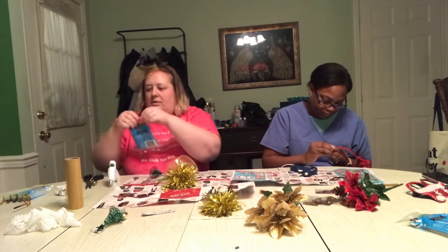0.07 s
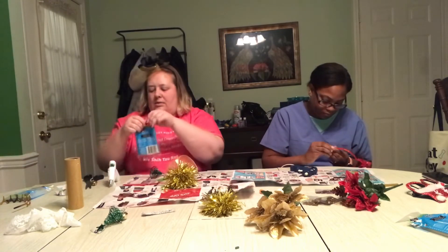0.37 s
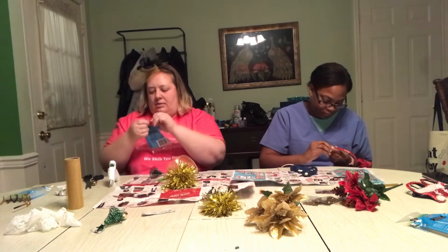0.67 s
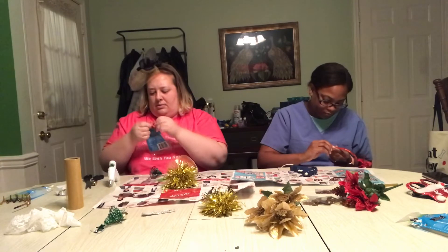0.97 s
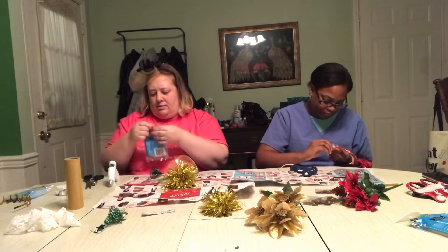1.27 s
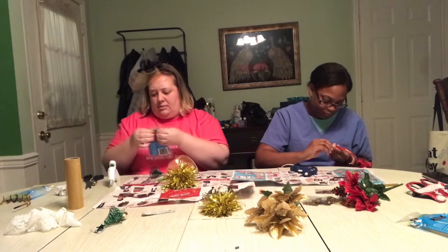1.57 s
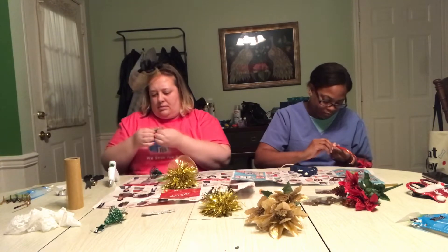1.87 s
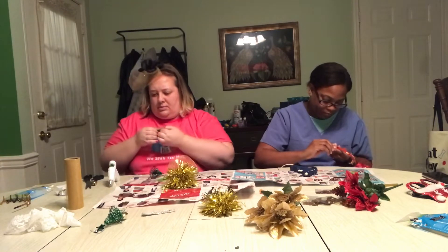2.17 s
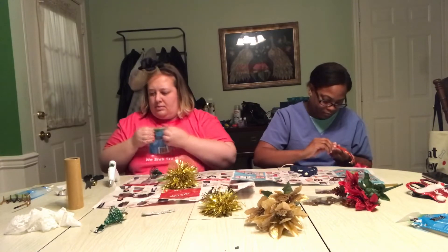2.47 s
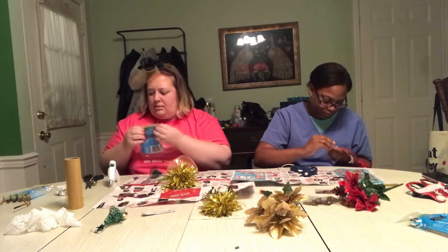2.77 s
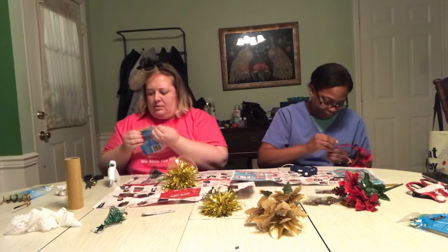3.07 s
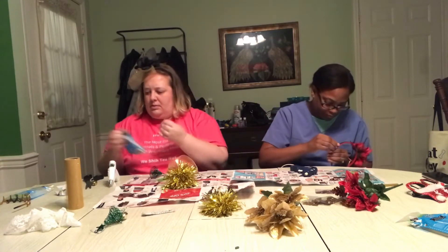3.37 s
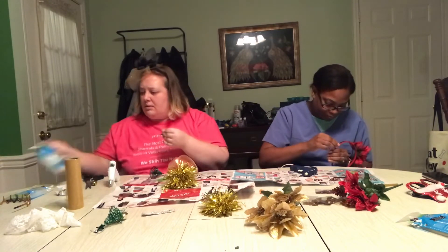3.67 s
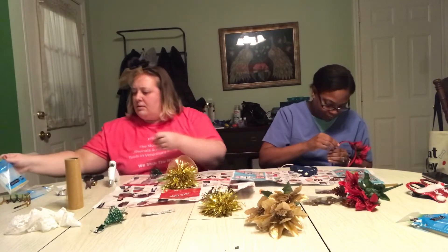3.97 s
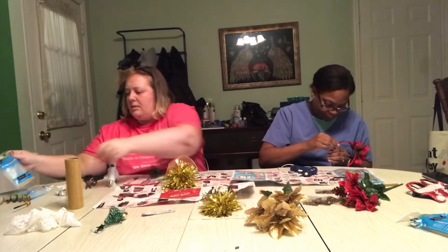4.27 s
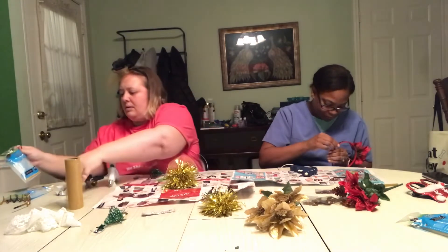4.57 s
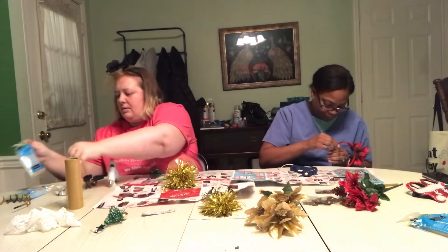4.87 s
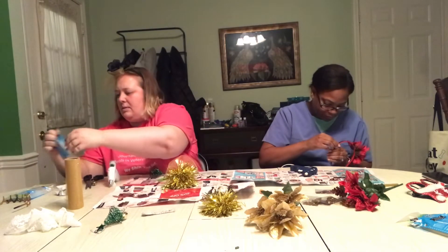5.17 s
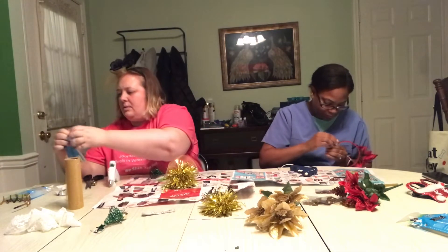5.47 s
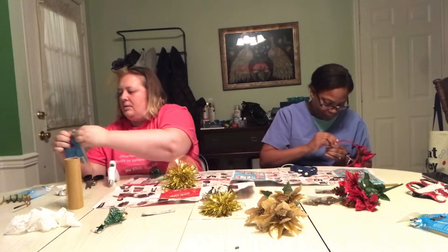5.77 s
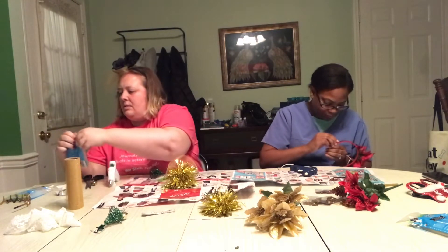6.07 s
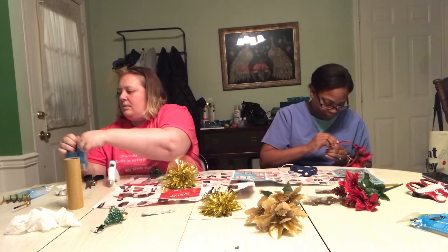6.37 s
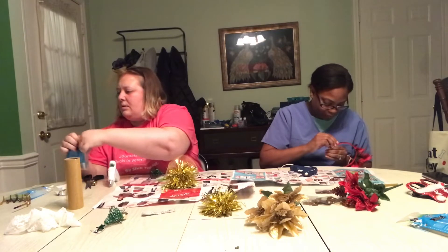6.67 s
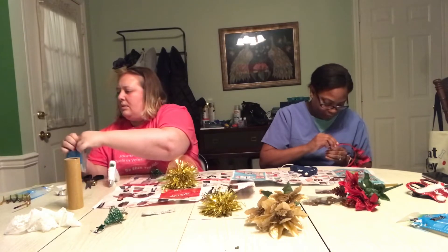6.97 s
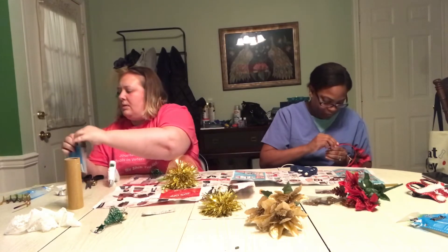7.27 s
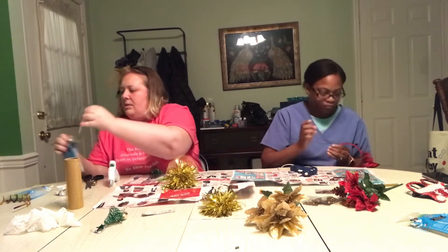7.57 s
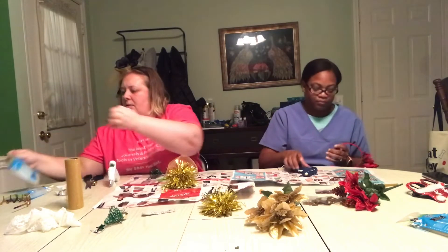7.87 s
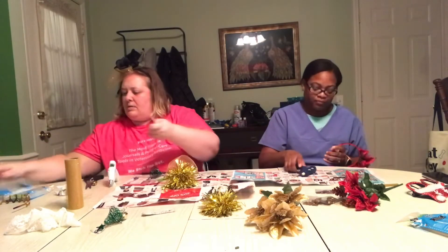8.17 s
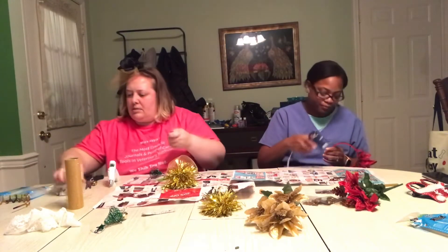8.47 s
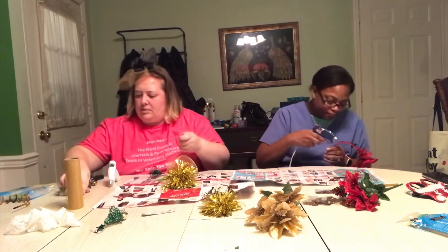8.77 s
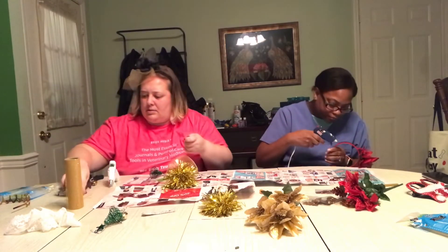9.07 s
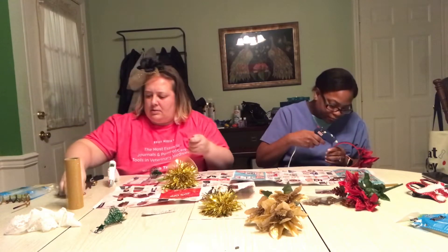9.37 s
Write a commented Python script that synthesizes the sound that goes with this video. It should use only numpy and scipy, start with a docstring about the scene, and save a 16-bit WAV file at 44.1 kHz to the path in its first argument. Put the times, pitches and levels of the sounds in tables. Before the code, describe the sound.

From the start, fingers squeeze and pull a stiff plastic packet, making uneven bursts of crinkling dotted with sharp, slightly hollow snaps. The crackle grows busier around 1.5 seconds. At about 2.4 seconds the packet gives way with one loud crack, by far the loudest sound. Handling continues, with two strong snaps near 3.2 and 3.4 seconds. From 3.5 to about 5.5 seconds there are only faint rustles and a few ticks, with a brief pause. Moderate crinkling and scattered clicks return from 5.6 to 8 seconds. Just after 8 seconds the packet skids briefly along a table and lands at about 8.25 with a light slap and a small thud. A couple of very faint rustles follow before the end, around 9.4 seconds. One microphone hears everything in a small dining room with short reverberation, a quiet, steady rush of air and a low electrical hum.

```python
"""A small dining room, one microphone, a stiff plastic packet held at the chest and later at arm's length.
The film crackles as fingers work it, single creases buckle with sharp snaps, and the packet gives way
with one loud crack. After more handling it skids along the table and lands with a slap.
Behind it are the room's short reverberation, its quiet rush of air and a low mains hum."""
import sys
import numpy as np
from scipy import signal
from scipy.fft import rfft, irfft
from scipy.io import wavfile
from scipy.ndimage import uniform_filter1d

SR = 44100
rng = np.random.default_rng(int(sys.argv[2]) if len(sys.argv) > 2 else 0)


def master(y):
    """Save y as 16-bit WAV."""
    cut = np.clip(np.atleast_2d(y).T, -1, 1)
    pcm = np.round(cut * 32767)  # scale
    wavfile.write(sys.argv[1], SR, pcm.astype(np.int16))


N = 414540
TAPS, TOP_HZ = 2048, 16100
HZ = np.fft.rfftfreq(TAPS, 1 / SR)
REACH_S = 3.45  # the opened packet is carried out to arm's length

# Room tone. Each row: frequency in Hz, relative level in dB.
AIR_COLOUR = [(12, -59), (25, -32), (40, -10), (70, -4), (104, -13.5), (123, -15.5), (241, -16), (262, -24),
              (301, -15), (328, -20), (422, -24.5), (780, -26.5), (1120, -28), (1400, -31.5),
              (13900, -45.5), (16000, -47)]
# Mains hum. Each row: frequency in Hz, level in dB.
HUM_PARTIALS = [(60, -69), (120, -77), (181, -75), (240, -75.5)]
# The packet shifting in the hands. Each row: start in seconds, end in seconds, relative level in dB.
HOLDS = [(0.03, .95, -66), (1.05, 3.38, -61), (3.45, 4.35, -73), (5.08, 5.6, -75), (5.65, 7.3, -66),
         (7.35, 8.07, -69), (8.35, 8.5, -70), (9.22, 9.38, -76)]
# Fingers squeezing and pulling. Each row: start in seconds, length in seconds, relative level in dB,
# then hollow body and crisp edge in dB against that level.
SQUEEZES = [(0.09, .05, -52.5, 2, -10), (0.155, .055, -46.5, -1, -7), (0.28, .16, -60, -2, -11),
            (0.47, .075, -54.5, 0, -6), (0.59, .10, -58, 5, -7), (0.735, .08, -58.5, -4, -9),
            (0.985, .04, -70, 9, -10), (1.024, .085, -53, 6, -11), (1.155, .045, -58, 2, -8),
            (1.278, .135, -49, 1, -7), (1.42, .09, -57, -3, -3), (1.54, .055, -45.5, -4, -11),
            (1.595, .07, -43, -3, -8), (1.68, .06, -47, -11, -7), (1.785, .085, -46, -11, -7),
            (1.90, .09, -52, -7, -10), (2.01, .11, -52, -3, -6), (2.15, .12, -50.5, 0, -7),
            (2.28, .07, -54, 1, -7), (2.383, .04, -41.5, -1, -5), (2.5, .07, -47, -10, -11),
            (2.6, .13, -56.5, 1, -7), (2.77, .2, -61, -1, -3), (3.0, .19, -61, -1, -8),
            (3.202, .09, -44.5, -4, -5), (3.335, .05, -40, -3, -4), (3.52, .05, -59, 0, -12),
            (3.62, .025, -56, -4, -3), (3.745, .095, -55, -7, -11), (3.95, .18, -67, -4, -3),
            (4.21, .1, -67, 0, -5), (4.46, .13, -69, -1, 2), (5.345, .03, -57, -4, -6),
            (5.4, .1, -63, -1, -9), (5.61, .11, -62, -2, -6), (5.74, .12, -58, 3, -7),
            (5.915, .095, -54.5, -1, -9), (6.02, .08, -51, -5, -6), (6.185, .13, -59, -1, -2),
            (6.34, .08, -55, 0, -6), (6.44, .06, -60, 1, -7), (6.515, .145, -53, -8, -8),
            (6.765, .045, -57.5, 1, -1), (6.98, .125, -57, -3, -5), (7.12, .19, -57.5, -2, -9),
            (7.485, .06, -58, -1, -3), (7.675, .13, -60, -3, -14), (7.83, .055, -53.5, -5, -5),
            (7.925, .05, -50.5, -6, -9)]
# The crackle at the chest, then at arm's length. Each row: frequency in Hz, relative level in dB.
CHEST_COLOUR = [(110, -35.5), (200, -14.5), (330, -8.5), (420, -10), (520, -1.5), (680, -1.5), (1140, -3.5),
                (1500, -11), (2000, -9), (4000, -5.5), (8700, -13), (10600, -14), (13000, -15.5),
                (16000, -22)]
REACH_COLOUR = [(160, -50), (280, -11), (326, -3), (442, -7), (515, 0), (786, -6.5), (1050, -0.5),
                (1600, -10.5), (1800, -10), (1960, -11), (2940, -8.5), (5700, -10.5), (7600, -19),
                (12600, -20.5), (16000, -27.5)]
# The air in the packet, sealed (used before REACH_S) and open (after).
# Each row: resonance in Hz, half-width in Hz, boost in dB.
POUCH_RESONANCES = [(620, 110, 2.5), (1089, 100, 3.5)]
# The loudest creases buckling. Each row: time in seconds, energy above the hollow body in dB,
# ring in Hz, then hollow body and crisp edge in dB against that energy.
SNAPS = [(0.0375, -27, 3900, -9, -16), (0.0962, -23, 3800, -5, -6), (0.1013, -18, 3360, -6, -7),
         (0.1621, -18.5, 3900, 1, -3), (0.1967, -13.5, 2700, -1, -5), (0.2862, -19.5, 2800, -6, -3),
         (0.3083, -21.5, 3500, -24, -20), (0.3592, -22.5, 3900, 0, -10), (0.3987, -19.5, 4000, -2, -16),
         (0.4341, -15.5, 5400, -5, -9), (0.4942, -17.5, 7100, -1, -2), (0.5266, -20, 6900, -8, -10),
         (0.5862, -23, 6100, -6, -4), (0.636, -23, 2300, 8, -10), (0.704, -19, 3460, -18, -14),
         (0.7398, -12.5, 3530, -11, -11), (0.775, -15, 5630, -13, -5), (0.874, -27, 4070, -6, -6),
         (1.0327, -17.5, 3820, -14, -12), (1.076, -17, 5570, 2, -9), (1.1098, -17.5, 3870, -11, -5),
         (1.1715, -18, 4000, -1, -9), (1.297, -19.5, 3300, -11, -15), (1.3075, -18, 3800, -13, -10),
         (1.3337, -14.5, 3970, -12, -7), (1.3932, -13.5, 3900, -6, -5), (1.4314, -16, 5300, -3, -1),
         (1.5441, -17.5, 3600, -2, -4), (1.6219, -13, 8850, -22, -1), (1.6831, -14, 5270, -11, -14),
         (1.7375, -16, 4500, -2, -3), (1.793, -12.5, 2360, -8, -14), (1.8159, -18, 4000, -9, -1),
         (1.8378, -11.5, 5600, -19, -3), (1.8763, -15.5, 5700, -11, -3), (2.0434, -19, 2200, -9, -2),
         (2.0695, -21, 6600, -24, -1), (2.1434, -16, 8750, -19, -1), (2.1618, -19, 8300, 0, -1),
         (2.1875, -13.5, 3900, -2, -10), (2.2428, -16.5, 5640, 1, -9), (2.3249, -19.5, 5700, -9, -1),
         (2.3904, -13.5, 5500, -4, -8), (2.404, -16, 6800, 0, -1), (2.5934, -14, 2460, -11, -3),
         (2.6715, -24.5, 5000, 12, -7), (2.6894, -17.5, 4930, -24, -6), (2.7932, -22.5, 2800, 1, -15),
         (2.8837, -10, 4000, -6, -10), (3.0385, -26, 5500, -1, -13), (3.1094, -24, 5600, -13, -4),
         (3.2027, -4.5, 4340, -7, -4), (3.2112, -15, 5630, 3, -10), (3.248, -13.5, 4600, -22, -3),
         (3.3598, -12, 2290, -5, -2), (3.5323, -25, 5040, -7, -18), (3.8229, -20, 4250, -15, -15),
         (4.11, -26, 5600, -6, -11), (5.0833, -34, 3220, -7, -22), (5.257, -35, 2870, 0, -20),
         (5.348, -26, 4500, -4, -9), (5.5965, -26, 4100, -8, -8), (5.6715, -22.5, 2300, -7, -8),
         (5.9591, -22.5, 3800, -7, -20), (6.1864, -17, 4770, -9, -13), (6.259, -20, 4600, -11, -4),
         (6.399, -32, 3800, 12, -13), (6.585, -21, 3780, -1, -10), (6.638, -28.5, 3000, 8, -12),
         (6.6433, -21, 8900, -17, -1), (6.7634, -13.5, 2610, -6, -1), (6.9881, -22.5, 5300, -16, -9),
         (7.0263, -18.5, 5700, -21, -11), (7.0838, -23, 5500, -22, -6), (7.5437, -16, 4740, -13, -5),
         (7.8419, -20, 7200, -9, -9), (7.9431, -19, 4500, -7, -13), (8.0737, -22.5, 3850, -11, -7),
         (8.1715, -14.5, 3500, -9, -9), (8.2495, -13, 5200, 2, -9), (8.389, -32, 3500, -8, -14)]
# One snap. Each row: frequency in Hz, relative level in dB.
SNAP_COLOUR = [(100, -33), (300, -31.5), (550, -12), (800, -5.5), (1080, 3.5), (1600, -12.5), (2200, -7),
               (3000, -8.5), (4200, -6), (6500, -6), (9500, -10.5), (11000, -12), (16000, -13.5)]
# The packet giving way: time in seconds, energy in dB, room send in dB.
CRACK = (2.442, 12.5, -1.4)
# The crack toward the microphone, then all round. Each row: frequency in Hz, relative level in dB.
CRACK_AHEAD = [(100, -38.5), (300, -28), (550, -13), (1050, -1), (1600, -19), (2300, -16.5), (2800, -10),
               (3200, -16.5), (3950, -3), (4700, -7.5), (5500, -17), (9500, -14), (11000, -21.5),
               (16000, -22.5)]
CRACK_AROUND = [(100, -32), (200, -18.5), (350, -17.5), (650, -4), (850, -3.5), (1100, 3), (1500, -7),
                (2000, -10.5), (2800, -4), (4300, -2.5), (5500, -6.5), (8000, -4), (10500, -9),
                (16000, -21.5)]
# The skid along the table: start and end in seconds, first and last relative level in dB.
SKID = (8.066, 8.258, -53, -43)
# The packet touching down. Each row: time in seconds, relative energy in dB.
CONTACTS = [(8.2455, -11), (8.2495, -13), (8.2570, -4), (8.2600, -12), (8.274, -24), (8.337, -24)]
# Packet and table ringing. Each row: frequency in Hz, relative level in dB, seconds to fall 60 dB.
TABLE_MODES = [(127.2, -20.5, 0.16), (226, -18, .2), (640, -6, .07), (746, -3.5, 0.19), (802, -6, .1),
               (934, -10, 0.1), (1040, -6, 0.12), (1141, -6.5, .13), (1265, -10, .05), (1534, -13, .06),
               (2600, -11, .02)]
# The dining room's decay. Each row: frequency in Hz, seconds to fall 60 dB.
ROOM_T60 = [(200, 0.4), (530, 0.2647), (1400, 0.3062), (3700, 0.27), (9700, 0.23), (16000, 0.34)]
# Its reverberation. Each row: frequency in Hz, gain in dB.
ROOM_COLOUR = [(200, 0), (600, 0.6), (1700, -0.59), (2700, 0.75), (7500, -0.45), (16000, -0.66)]


def amp(db):
    """Decibels to amplitude."""
    return 10 ** (np.asarray(db) / 20)


def unit_power(x):
    """Scales to a mean power of one."""
    return x / np.sqrt(np.mean(x ** 2) + 1e-20)


def wander(length, span):
    """A random curve of unit power, smoothed over span points."""
    return unit_power(uniform_filter1d(rng.standard_normal(length), size=span))


def curve_at(points, hz):
    """Reads a curve on a log-frequency axis."""
    frequencies, values = np.transpose(points)
    return np.interp(np.log(hz + 1), np.log(frequencies + 1), values)


def add(mix, start_s, sound):
    """Mixes a sound in at its start time."""
    part = mix[round(start_s * SR):][:len(sound)]
    part += sound[:len(part)]


def through(x, response):
    """Convolves and keeps the length."""
    return signal.oaconvolve(x, response)[:len(x)]


def sharpest_pulse(gain):
    """The minimum-phase pulse that has this spectrum."""
    log_gain = np.log(np.maximum(gain, gain.max() * 1e-5))
    mirrored = np.concatenate([log_gain, log_gain[-2:0:-1]])
    return irfft(np.exp(np.conj(signal.hilbert(mirrored)))[:len(gain)])


def room_tone(rush_db=-59.1):
    """The steady low rush of the room, with mains hum."""
    t = np.arange(N) / SR
    colour = amp(curve_at(AIR_COLOUR, np.fft.rfftfreq(N, 1 / SR)))
    rush = irfft(rfft(rng.standard_normal(N)) * colour, N)
    hum = sum(amp(db) * np.sqrt(2) * np.sin(2 * np.pi * (hz * t + rng.random()))
              for hz, db in HUM_PARTIALS)
    return amp(rush_db) * unit_power(rush) + hum


def registers(gain, body_hz=1700, edge_hz=8000):
    """Splits a spectrum into hollow body, film and crisp edge, each of unit power."""
    body = 1 / (1 + (HZ / body_hz) ** 10)
    edge = 1 - 1 / (1 + (HZ / edge_hz) ** 12)
    film = (1 - body) * (1 - edge)
    return [unit_power(gain * np.sqrt(abs(share))) for share in (body, film, edge)]


def packet_colour(at_reach, boost_db=0):
    """Spectrum of the film with the resonance of the air it encloses."""
    hz, width_hz, db = POUCH_RESONANCES[at_reach]
    resonance_db = (db + boost_db) / (1 + ((HZ - hz) / width_hz) ** 2)
    return amp(curve_at(REACH_COLOUR if at_reach else CHEST_COLOUR, HZ) + resonance_db)


def stroke(length_s, change_db, attack_s=.012, release_s=.02):
    """Power of one movement: a quick attack, a hold that may swell or sag, a release."""
    t = np.arange(0, length_s + 8 * release_s, 1 / SR)
    attack = np.minimum(t / attack_s, 1)
    hold = amp(change_db * np.minimum(t / length_s, 1))
    release = np.exp(-np.maximum(t - length_s, 0) / release_s)
    return (attack * hold * release) ** 2


def handling(sag_db=-2, hold_edge_db=-8, skid_body_db=-4, skid_edge_db=-9):
    """Strength of hollow body, film and crisp edge as squeezes, holding and the skid add up."""
    moves = [(*squeeze, sag_db) for squeeze in SQUEEZES]
    moves += [(start, end - start, db, 0, hold_edge_db, 0) for start, end, db in HOLDS]
    start, end, first_db, last_db = SKID
    moves.append((start, end - start, first_db, skid_body_db, skid_edge_db, last_db - first_db))
    power = np.zeros((3, N))
    for start, length, db, body_db, edge_db, change_db in moves:
        shape = stroke(length, change_db)
        for register, colour_db in zip(power, (body_db, 0, edge_db)):
            add(register, start, amp(db + colour_db) ** 2 * shape)
    return np.sqrt(power)


def facet_ring(hz, ring_s=.00019, tick_s=.00028):
    """One small facet of film: a brief ring at its own pitch and an equally strong broad tick."""
    age = np.arange(TAPS // 8) / SR
    ring = np.cos(2 * np.pi * hz * age) * age * np.exp(-age / ring_s)
    tick = rng.standard_normal(len(age)) * np.exp(-age / tick_s)
    return unit_power(unit_power(ring) + unit_power(tick))


def crackle(flips_per_s=900, spread_db=4.7, facets=32, uneven_db=.7, trim_db=-1):
    """Countless tiny creases flip, each on one of many facets, over the rub of film on film."""
    t = np.arange(N) / SR
    sizes = amp(spread_db * np.minimum(rng.exponential(1, N), 4))
    flips = sizes * rng.choice([-1, 1], N) * (rng.random(N) < flips_per_s / SR)
    facet = rng.integers(0, facets, N)
    pitches = (np.arange(facets) + rng.random(facets)) / facets * TOP_HZ
    grains = sum(through(flips * (facet == k), facet_ring(hz)) for k, hz in enumerate(pitches))
    rub = np.select([t < REACH_S, t < SKID[0]], [.17, .28], .8)  # held taut, loose, skidding
    grains = unit_power(grains) + rub * rng.standard_normal(N)
    # levelled, so the work of the fingers sets how much energy the creases release
    grains /= np.sqrt(uniform_filter1d(grains ** 2, size=2400) + 1e-9)
    grains *= amp(uneven_db * wander(N, 800))  # the film gives in fits and starts
    reach = np.clip((t - REACH_S) * 10, 0, 1)
    strengths = handling() * amp(trim_db)
    out = np.zeros(N)
    for at_reach, share in enumerate((1 - reach, reach)):
        for strength, gain in zip(strengths, registers(packet_colour(at_reach))):
            out += through(grains * share * strength, sharpest_pulse(gain))
    return out


def bending_pulse(gain, spread_s):
    """A unit-energy pulse whose frequencies arrive a little apart, as bending waves do in thin film."""
    delay_s = spread_s * abs(wander(len(HZ), 60))
    phase_lag = np.exp(-2j * np.pi * np.cumsum(delay_s) * HZ[1])
    pulse = irfft(rfft(sharpest_pulse(gain)) * phase_lag)[:TAPS // 2]
    return pulse / np.linalg.norm(pulse)


def snaps(width_hz=900, ring_db=9.5, beam_db=4, spread_s=.00075, pouch_share=.8, room_db=-3.6):
    """Each crease flips at once: its facet rings briefly and the whole packet gives a hollow pop."""
    direct, to_room = np.zeros(N), np.zeros(N)
    # a whole panel flipping excites the enclosed air more than the crackle does
    pouch = [registers(packet_colour(at_reach, boost_db=4.5))[0] for at_reach in (False, True)]
    for start, db, hz, body_db, edge_db in SNAPS:
        peak_db = ring_db / (1 + ((HZ - hz) / width_hz) ** 2)
        body, film, edge = registers(amp(curve_at(SNAP_COLOUR, HZ) + peak_db))
        body = unit_power(body + pouch_share * (pouch[int(start > REACH_S)] - body))
        edge_share = min(amp(edge_db) ** 2, .8)
        power = (amp(body_db) * body) ** 2 + (1 - edge_share) * film ** 2 + edge_share * edge ** 2
        size = amp(db) * np.sqrt(power.mean())
        # a facet beams unevenly at the microphone; the room receives the mean of all directions
        beam = amp(beam_db * wander(len(HZ), 36))
        add(direct, start, size * bending_pulse(np.sqrt(power) * beam, spread_s))
        add(to_room, start, size * amp(room_db) * bending_pulse(np.sqrt(power), spread_s))
    return direct, to_room


def crack(spread_s=.0007):
    """The stretched packet lets go all at once: one pulse to the microphone, one into the room."""
    start, db, room_db = CRACK
    direct, to_room = np.zeros(N), np.zeros(N)
    add(direct, start, amp(db) * bending_pulse(amp(curve_at(CRACK_AHEAD, HZ)), spread_s))
    add(to_room, start, amp(db + room_db) * bending_pulse(amp(curve_at(CRACK_AROUND, HZ)), spread_s))
    return direct, to_room


def landing(slap_hz=560, thud_band_hz=(90, 260), thud_db=2):
    """The packet lands edge first and slaps flat, ringing the table; each contact favours other modes."""
    t = np.arange(SR // 3) / SR
    modes = np.array([amp(db - 60 * t / t60) * np.cos(2 * np.pi * hz * t) for hz, db, t60 in TABLE_MODES])
    knocks = np.zeros(N)
    for start, db in CONTACTS:
        weights = rng.choice([-1, 1], len(modes)) * rng.uniform(.53, 1.2, len(modes))
        knock = weights @ modes
        add(knocks, start, amp(db) * knock / np.linalg.norm(knock))
    # a light packet gives mostly slap, with a small thud of the table top
    slap = signal.sosfilt(signal.butter(3, slap_hz, "high", fs=SR, output="sos"), knocks)
    thud = signal.sosfilt(signal.butter(2, thud_band_hz, "band", fs=SR, output="sos"), knocks)
    return slap + amp(thud_db) * thud


def room_response(build_s=.0023, echo_db=-20):
    """A few echoes from table and walls in a dense tail, each band dying at its own speed."""
    reflections = rng.choice([-1., 1.], SR // 2) * (rng.random(SR // 2) < .25)
    hz, t, bands = signal.stft(reflections, SR, nperseg=256)
    decay = amp(-60 * t / curve_at(ROOM_T60, hz)[:, None])
    tail = signal.istft(bands * decay, SR, nperseg=256)[1]
    tail *= 1 - np.exp(-np.arange(len(tail)) / SR / build_s)
    tail /= np.linalg.norm(tail)
    for delay_s in (.0044, .0062, .011, .027):
        tail[round(delay_s * rng.uniform(.9, 1.1) * SR)] += amp(echo_db)
    return through(tail, sharpest_pulse(amp(curve_at(ROOM_COLOUR, HZ))))


def dining_room(x, paths=4, changes_per_s=45):
    """Facets face ever-changing ways, so the sound takes several paths round the room in turn."""
    turn = np.arange(N) / SR * changes_per_s
    out = np.zeros(N)
    for k in range(paths):
        away = abs((turn - k) % paths - paths / 2)
        fade = np.cos(np.pi / 2 * np.minimum(away, 1))
        out += through(x * fade, room_response())
    return out


def scene(crackle_room_db=-1, landing_room_db=-4):
    """At the microphone: the packet heard directly, its reverberation and the room tone."""
    buckling, buckling_to_room = np.add(snaps(), crack())
    film, knocks = crackle(), landing()
    to_room = buckling_to_room + amp(crackle_room_db) * film + amp(landing_room_db) * knocks
    return (buckling + film + knocks + dining_room(to_room) + room_tone())[None]


def record(dry, ceiling=.88):
    """The loud crack's highest peaks are clipped; then the treble is cut above TOP_HZ."""
    clipped = np.clip(dry, -ceiling, ceiling)
    lowpass = signal.firwin(255, TOP_HZ, window=("kaiser", 8), fs=SR)
    return signal.oaconvolve(clipped, lowpass[None], "same")


dry = scene()
out = record(dry)
master(out)
```